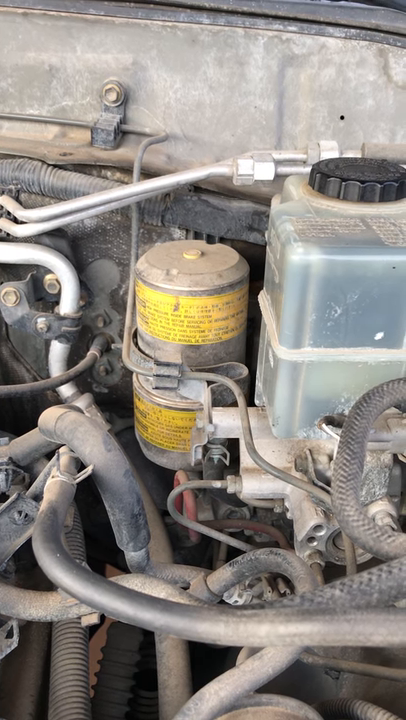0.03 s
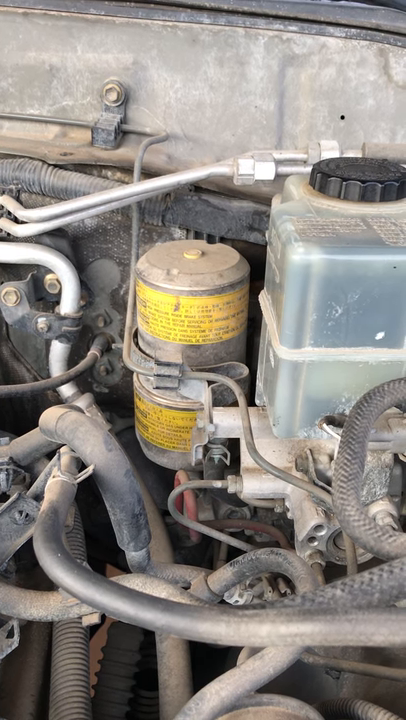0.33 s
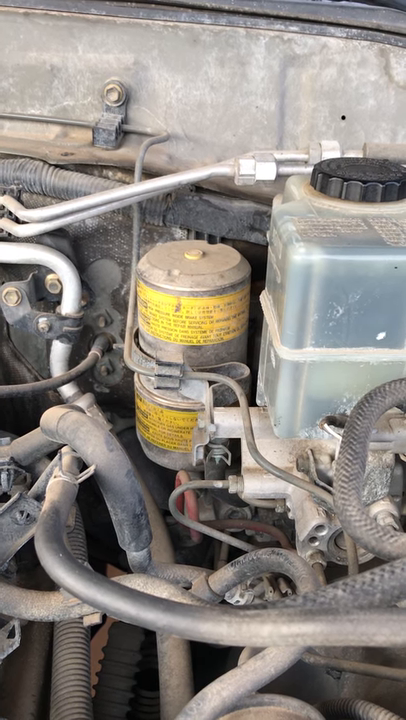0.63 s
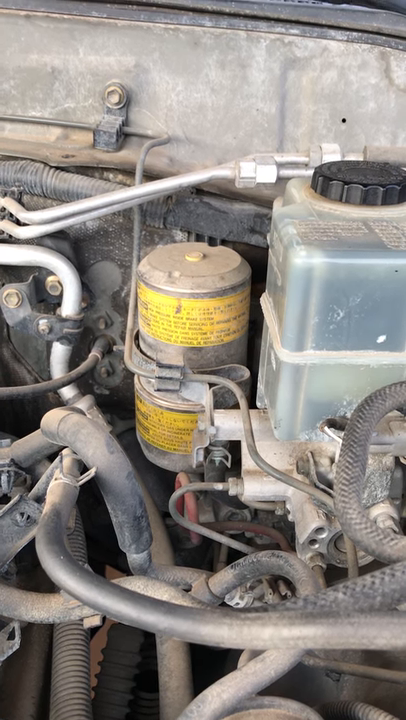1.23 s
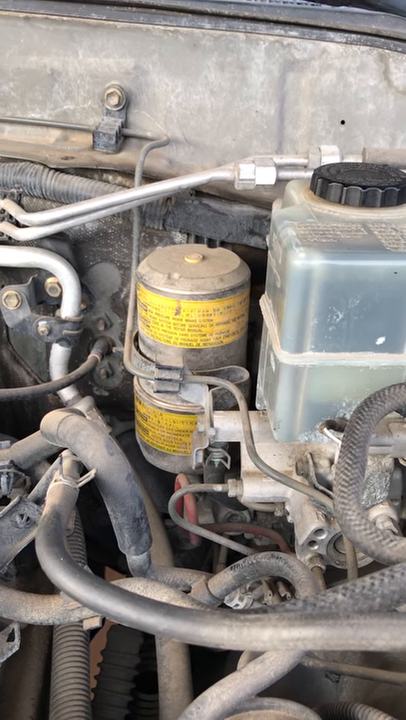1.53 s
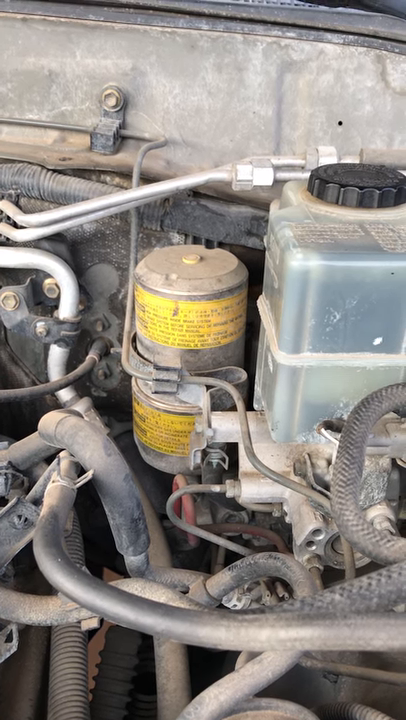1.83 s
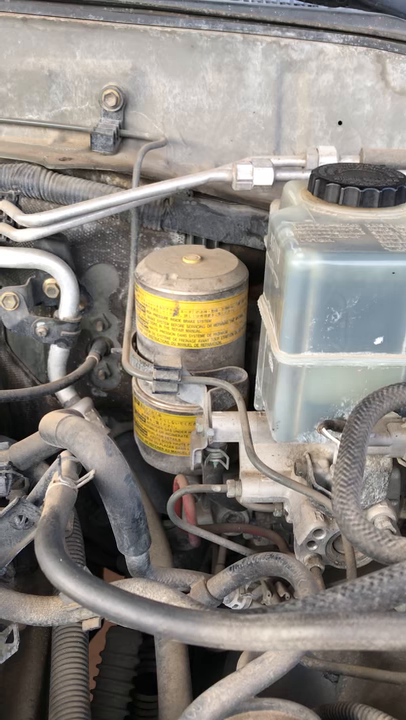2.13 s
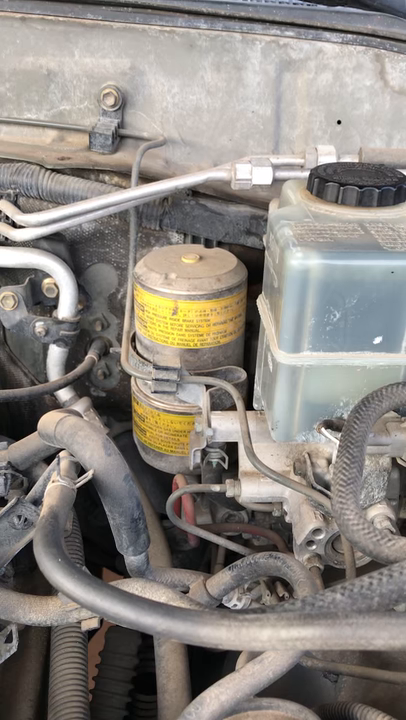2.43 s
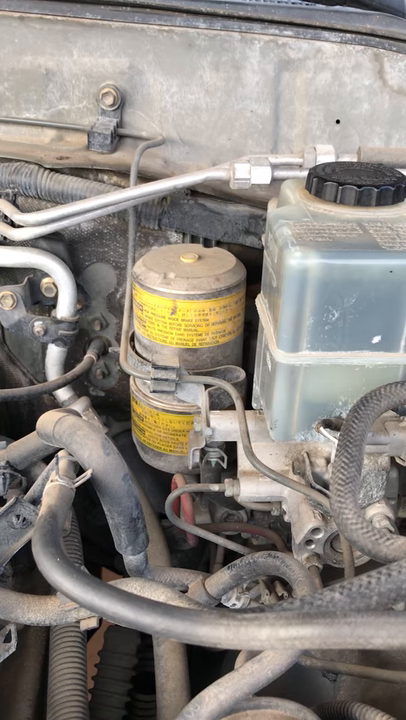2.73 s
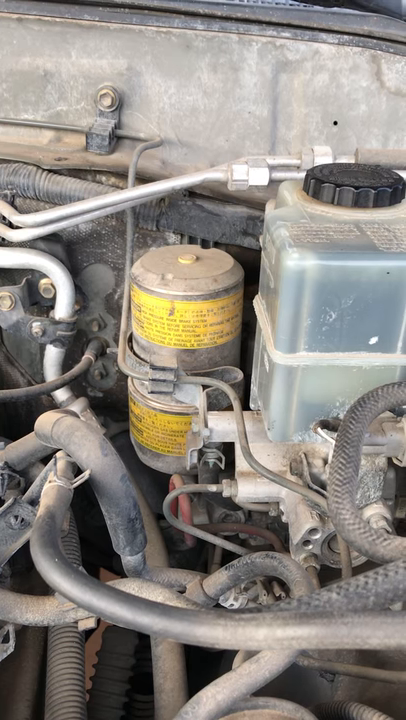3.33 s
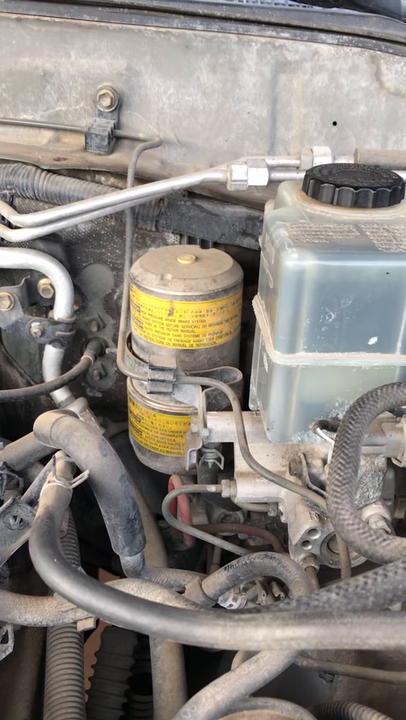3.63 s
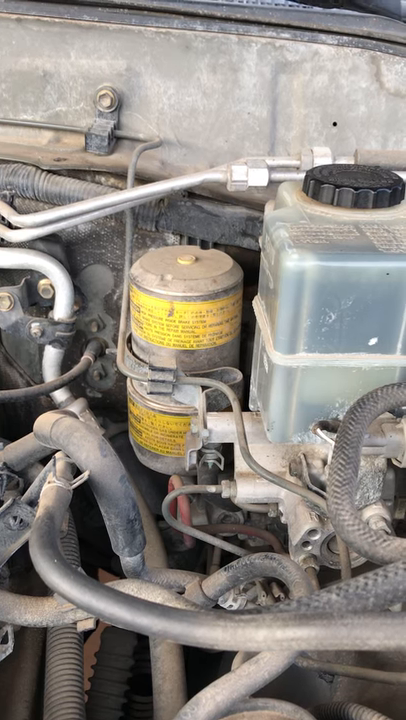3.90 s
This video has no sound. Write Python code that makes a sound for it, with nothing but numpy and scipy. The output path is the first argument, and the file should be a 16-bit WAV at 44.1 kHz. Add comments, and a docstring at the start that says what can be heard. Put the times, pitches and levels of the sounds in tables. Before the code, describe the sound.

Close in a car's open engine bay, an electric pump motor clacks on, runs with a loud, rattling buzz, then thumps off and ticks to rest. A thin whine, low hum and slight wind sit behind it.

```python
"""A clack, a hard buzz, then a thump and ever slower ticks: an electric brake booster pump starts, runs
and coasts to rest, close up in an open engine bay. Two knocks per shaft turn ring its housing to make
the buzz, brushes and bearings whirr, and the motor jolts on its mount as the current switches.
Behind it: a thin electrical whine, a low hum, faint taps and a little wind on the microphone."""
import sys
import numpy as np
from scipy import signal
from scipy.fft import rfft, irfft
from scipy.io import wavfile
from scipy.ndimage import uniform_filter1d

SR = 44100
rng = np.random.default_rng(int(sys.argv[2]) if len(sys.argv) > 2 else 0)


def int16_out(signal):
    """Quantize to a 16-bit WAV file."""
    q = np.round(np.clip(np.atleast_2d(signal).T, -1, 1) * 32767)
    wavfile.write(sys.argv[1], SR, q.astype(np.int16))


N = 176400

# resonant colour of the pump housing (frequency [Hz], gain [dB])
HOUSING = [(150, -35), (380, -16), (470, -23), (900, -18), (1130, -17), (1330, -23), (1750, -16),
           (1930, -7), (2250, -4), (2480, -16), (2620, -7), (2780, -9), (3220, 1), (3500, -5), (3800, -13),
           (4180, -4), (4440, -14), (4720, -5), (5100, -11), (5800, -9), (6100, -3), (6290, -12),
           (6570, -13), (6730, -2), (7100, -9), (7500, -16), (8200, -9), (9000, -16), (9450, -13),
           (10100, -21), (11100, -20), (11450, -14), (11900, -20), (12500, -14), (13500, -21),
           (17000, -25.5)]


def undb(db):
    """Decibels to amplitude."""
    return np.exp(np.asarray(db) * np.log(10) / 20)


def level(x, db=0):
    """Scale to an rms level."""
    return x * undb(db) / np.sqrt(np.mean(x ** 2) + 1e-20)


def curve(table, at, column=1):
    """Interpolate one column of a table along its first."""
    rows = np.array(table)
    return np.interp(at, rows[:, 0], rows[:, column])


def ring(x, response):
    """Let a signal excite an impulse response."""
    return signal.oaconvolve(x, response)[:N]


def colour(x, points, size=4096):
    """Minimum-phase EQ through (frequency [Hz], gain [dB]) points."""
    hz, db = np.array(points).T
    log_gain = np.interp(np.log(np.fft.rfftfreq(size, 1 / SR) + 1), np.log(hz), db) * np.log(10) / 20
    cepstrum = irfft(log_gain)
    cepstrum[1:size // 2] *= 2
    cepstrum[size // 2 + 1:] = 0
    return ring(x, irfft(np.exp(rfft(cepstrum, size))))


def crossover(lows, highs, hz):
    """Join the lows of one signal to the highs of another."""
    lowpass = signal.butter(3, hz, "low", fs=SR, output="sos")
    highpass = signal.butter(3, hz, "high", fs=SR, output="sos")
    return signal.sosfilt(lowpass, lows) + signal.sosfilt(highpass, highs)


def drift(rate_hz):
    """Slow random wander with an rms of 1."""
    step = int(SR / rate_hz)
    stairs = np.repeat(rng.standard_normal(N // step + 1), step)
    return level(uniform_filter1d(stairs, step)[:N])


def envelope(age, rise, hold, decay):
    """Linear rise, hold, exponential decay, all in seconds."""
    return np.clip(age / rise, 0, 1) * np.exp(-np.clip((age - rise - hold) / decay, 0, 20))


def burst(env, lo_hz, hi_hz):
    """Band noise under an envelope."""
    band = signal.butter(2, [lo_hz, min(hi_hz, SR / 2 - 1)], "band", fs=SR, output="sos")
    return env * np.resize(level(signal.sosfilt(band, rng.standard_normal(N // 8))), N)


def diffuse(env, passes=6):
    """Dense ringing with a given envelope and an even spectrum."""
    response = env * rng.standard_normal(len(env))
    for _ in range(passes):
        local_rms = np.sqrt(uniform_filter1d(response ** 2, size=64).clip(0) + 1e-14)
        spectrum = rfft(response * env / local_rms)
        response = irfft(spectrum / (abs(spectrum) + 1e-12), len(env))
    return response


def outdoor_air():
    """A soft, steady bed of dark noise."""
    # tone of the air (frequency [Hz], gain [dB])
    air_eq = [(100, 0), (300, 0), (600, -3), (1100, -2), (1500, -8), (2000, -9), (2800, -14), (4400, -12),
              (5500, -18), (9000, -25), (17000, -27)]
    return level(colour(rng.standard_normal(N), air_eq), db=-63)


def electrical_whine(t):
    """Thin steady tones, each wavering a little in phase."""
    # whine partials (frequency [Hz], level [dB])
    partials = [(732.1, -76), (974.4, -77), (1222, -65), (1464, -81), (1895, -83), (1954, -80), (2196, -84),
                (3418, -78), (3790, -79), (4151, -81), (4393, -78), (4640, -78)]
    return sum(level(np.sin(2 * np.pi * hz * t + .2 * drift(8)), db) for hz, db in partials)


def low_hum(t):
    """A wavering low tone that rises and swells as the pump stops."""
    # path of the hum (time [s], pitch [Hz], level [dB])
    path = [(2.45, 56, -60), (2.6, 59, -53), (2.78, 64, -48), (2.95, 70, -48.5), (3.28, 72.4, -46),
            (3.39, 68, -53), (3.47, 70.6, -45), (3.75, 70, -45.5), (3.98, 69, -46)]
    tone = level(np.sin(2 * np.pi * np.cumsum(curve(path, t)) / SR))
    return tone * undb(curve(path, t, column=2) + 1.1 * drift(14))


def wind(t):
    """Wind on the microphone: a swelling rumble with a few buffets."""
    # tone of the rumble (frequency [Hz], gain [dB])
    rumble_eq = [(20, -32), (35, -16), (55, 0), (95, -3), (130, -10), (200, -20), (400, -38), (2000, -80)]
    # buffets (time [s], level [dB], width [s], top of band [Hz])
    buffets = [(.056, -40, .01, 100), (.135, -46, .025, 130), (.6, -44, .03, 130), (.668, -39, .009, 120),
               (.724, -37, .02, 190), (.943, -43, .018, 110), (1.43, -46, .03, 75), (1.62, -47, .025, 80),
               (1.84, -53, .05, 170), (2.41, -47, .03, 80)]
    out = level(colour(rng.standard_normal(N), rumble_eq) * undb(1.5 * drift(7)), db=-53)
    for centre, db, width, top_hz in buffets:
        swell = np.exp(-np.minimum(.5 * ((t - centre) / width) ** 2, 20))
        out += undb(db) * burst(swell, 45, top_hz)
    return out


def faint_taps(t):
    """Small taps and rustles near the microphone."""
    # taps (time [s], level [dB], band centre [Hz], decay [s])
    taps = [(.028, -63, 9000, .006), (.137, -63, 8000, .004), (.157, -45, 6500, .0025),
            (.164, -58, 5500, .018), (.229, -65, 6000, .008), (.472, -66, 7000, .005),
            (.489, -65, 8000, .005), (3.25, -63, 1300, .02), (3.846, -51, 210, .005),
            (3.903, -53, 1200, .003)]
    return sum(undb(db) * burst(envelope(t - start, .0006, 0, decay), hz / 1.5, hz * 1.5)
               for start, db, hz, decay in taps)


def clunk(age, eq, modes, db, rise, hold, decay, tail_db):
    """The motor jolts on its mount: a short clatter and ringing brackets."""
    env = envelope(age, rise, hold, decay) + undb(tail_db) * envelope(age, rise, hold, decay=.03)
    out = env * level(colour(rng.standard_normal(N), eq), db)
    for hz, peak_db, lag, mode_hold, t60 in modes:
        fade = envelope(age - lag, rise=.004, hold=mode_hold, decay=t60 / np.log(1000))
        out += undb(peak_db) * np.sin(2 * np.pi * hz * age) * fade
    return out


def switching(t):
    """A clack as the current comes on and a thump as it cuts off."""
    # tone of each clatter (frequency [Hz], gain [dB])
    on_eq = [(59, -40), (100, -10), (326, 2), (754, -13), (1060, -1), (1350, -16), (2980, -9), (3860, -18),
             (6190, -9), (10800, -23), (17000, -29)]
    off_eq = [(100, -26), (200, -21), (330, -3), (600, -4), (900, -9), (1250, -6), (1450, -15), (1750, -8),
              (2050, -15), (2500, -9), (3000, -17), (6500, -20), (9000, -27), (11000, -36), (17000, -45)]
    # bracket modes (frequency [Hz], peak level [dB], lag [s], hold [s], t60 [s])
    on_modes = [(350, -29, .003, .008, .09), (1001, -32, .002, .004, .084)]
    off_modes = [(345, -28, .003, .016, .05), (517, -49, .005, .01, 1.2), (599, -29, .006, .011, .04),
                 (770, -37, .006, .012, .07), (861, -41, .01, .01, .11), (1125, -51, .005, .01, .7),
                 (1230, -34, .004, .012, .05), (1695, -28, .008, .011, .025), (2509, -25, .001, .005, .025)]
    on_s, off_s = .5434, 2.549
    clack = clunk(t - on_s, on_eq, on_modes, db=-25.3, rise=.0012, hold=.006, decay=.0036, tail_db=-19)
    thump = clunk(t - off_s, off_eq, off_modes, db=-29, rise=.002, hold=.015, decay=.005, tail_db=-14)
    return clack + thump


def strokes(turns, at_turn, force_column):
    """One blow per turn at a given shaft angle, slightly uneven in time and force."""
    # force of the blows (time [s], pressure stroke [dB], return stroke [dB])
    force = [(.585, -6, -7), (.609, -5, -4), (.631, 0, -2), (1.1, 0, 0), (2.5, -1, 0), (2.604, 0, -4),
             (2.627, -7, -7), (2.652, 1.5, -5), (2.68, 1, -4), (2.711, -6, -6), (2.747, -1.5, -11),
             (2.792, -3.5, -11), (2.858, -14, -18), (2.96, -14, -18)]
    jitter_s, scatter_db = .000048, 1.1
    times = np.flatnonzero(np.diff(np.floor(turns - at_turn)) > 0) / SR
    late, strong = rng.standard_normal((len(times), 2)).T
    onsets = np.round((times + jitter_s * late) * SR).astype(int)
    blows = np.zeros(N)
    blows[onsets] = undb(curve(force, times, force_column) + scatter_db * strong)
    return blows


def knocks(blows, eq, db, rise, decay, tail_db):
    """Blows ring the housing alike each turn in the lows and mids, and rattle freely in the treble."""
    age = np.arange(SR // 10) / SR
    env = envelope(age, rise, 0, decay) + undb(tail_db) * envelope(age, rise, 0, decay=.014)
    low_env = envelope(age, rise, 0, decay=.012)  # the lows ring on longer
    response = crossover(diffuse(low_env), diffuse(env), hz=1700)
    ringing = level(ring(blows, response))
    rattle_env = np.sqrt(abs(ring(blows ** 2, env ** 2)))
    rattle = level(rattle_env * rng.standard_normal(N))
    mix = crossover(ringing, rattle, hz=5200)
    return level(colour(colour(mix, eq), HOUSING), db)


def disperse(x):
    """Each frequency crosses the housing in its own time, turning a knock into a tiny chirp."""
    # travel through the housing (frequency [Hz], delay [s])
    travel = [(2000, 0), (3200, .0002), (4200, .0012), (5200, .002), (6500, .0009), (8000, 0)]
    delay = curve(travel, np.fft.rfftfreq(N, 1 / SR))
    lag_cycles = np.cumsum(delay) * SR / N
    return irfft(rfft(x) * np.exp(-2j * np.pi * lag_cycles), N)


def body_ring(pressure_blows, return_blows):
    """The softer return stroke rings the body's low modes, the pressure stroke its high ones."""
    # pump body modes (frequency [Hz], level [dB], t60 [s])
    modes = [(382, -63, .16), (927, -64, .09), (2178, -47, .036), (2288, -53, .05), (4700, -55.5, .04),
             (6443, -51.5, .13), (6740, -56.5, .03), (9380, -60.5, .06), (14580, -62.5, .04)]
    age = np.arange(SR // 8) / SR
    out = np.zeros(N)
    for hz, db, t60 in modes:
        blows = return_blows if hz < 2900 else pressure_blows
        mode = np.sin(2 * np.pi * hz * age) * undb(-60 * age / t60)
        out += level(ring(blows, mode), db)
    return out


def pump(t):
    """The shaft drives two knocks and one shake per turn; brushes and bearings whirr with its speed."""
    # spin-up, run and coast of the shaft (time [s], speed [turns/s])
    shaft = [(.544, 0), (.58, 35.173), (.62, 45.628), (.67, 51.813), (.78, 54.415), (1.05, 54.582),
             (1.8, 54.531), (2.2, 54.498), (2.55, 54.534), (2.66, 36.985), (2.77, 21.774), (2.86, 10.954),
             (2.96, 8.424), (3.02, 0)]
    # tone of each stroke's knock (frequency [Hz], gain [dB])
    pressure_eq = [(400, -5), (1400, -3.5), (2300, -8), (3000, .5), (5000, 1.8), (7000, 0), (9000, -1.5),
                   (12000, 1.2)]
    return_eq = [(350, -3), (600, 1), (1400, -1.5), (1900, 4), (2200, 3.5), (2600, 3), (3100, 1.5),
                 (4200, -3), (8000, -2), (12000, -4.5)]
    speed = curve(shaft, t)
    turns = .234 + np.cumsum(speed) / SR  # the shaft starts part-way round
    pressure_blows = strokes(turns, at_turn=0, force_column=1)
    return_blows = strokes(turns, at_turn=.325, force_column=2)
    pressure_knocks = knocks(pressure_blows, pressure_eq, db=-42.7, rise=.0005, decay=.002, tail_db=-9.5)
    return_knocks = knocks(return_blows, return_eq, db=-43.3, rise=.0006, decay=.0035, tail_db=-10.5)
    whirr = level(speed ** 3 * colour(rng.standard_normal(N), HOUSING), db=-48.2)
    shake = level(speed ** 2 * np.sin(2 * np.pi * turns), db=-56)
    return disperse(pressure_knocks) + return_knocks + body_ring(pressure_blows, return_blows) + whirr + shake


def scene():
    """The pump and its clunks over the outdoor background, in mono."""
    t = np.arange(N) / SR
    machine = switching(t) + pump(t)
    background = faint_taps(t) + wind(t) + electrical_whine(t) + low_hum(t) + outdoor_air()
    return (machine + background)[None]


def record(dry):
    """A steep low-pass takes off the very top."""
    top_hz = 17300
    return signal.sosfilt(signal.ellip(10, .2, 70, top_hz, fs=SR, output="sos"), dry)


dry = scene()
out = record(dry)
int16_out(out)
```